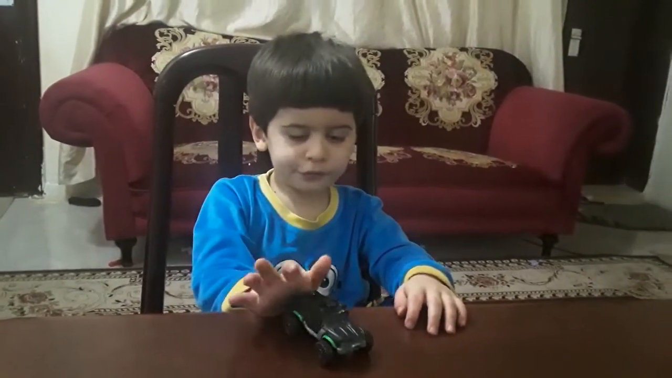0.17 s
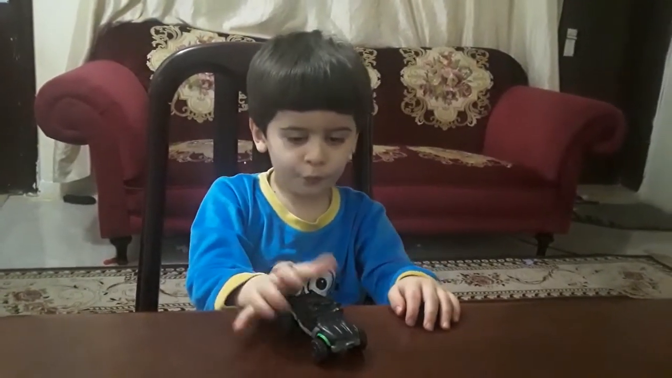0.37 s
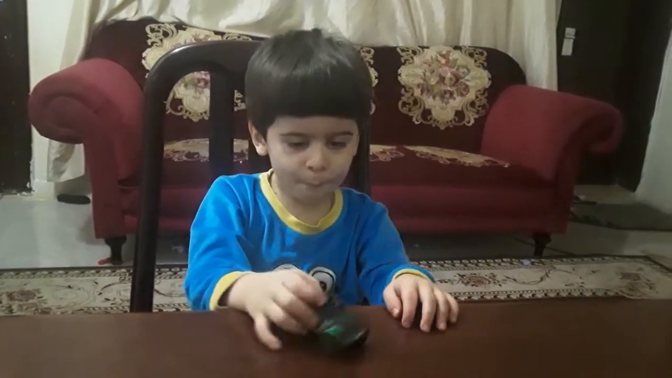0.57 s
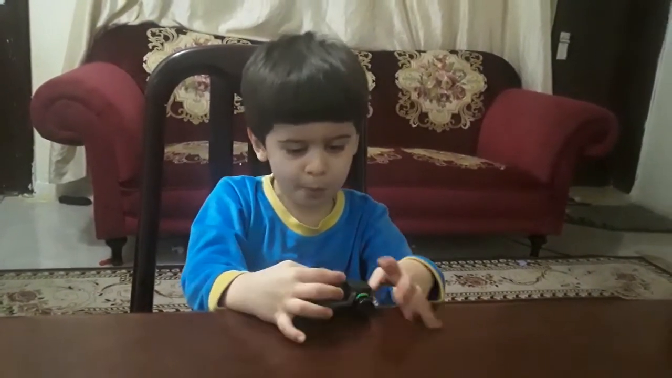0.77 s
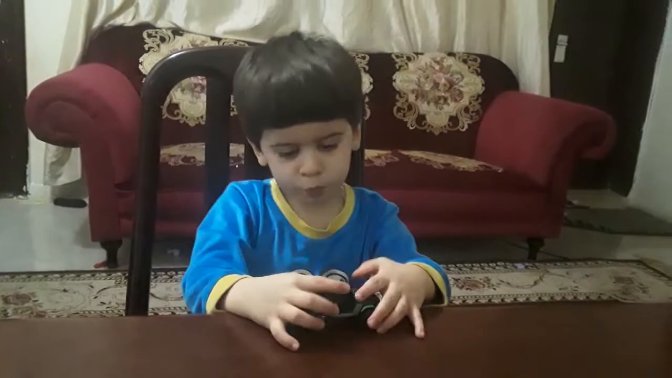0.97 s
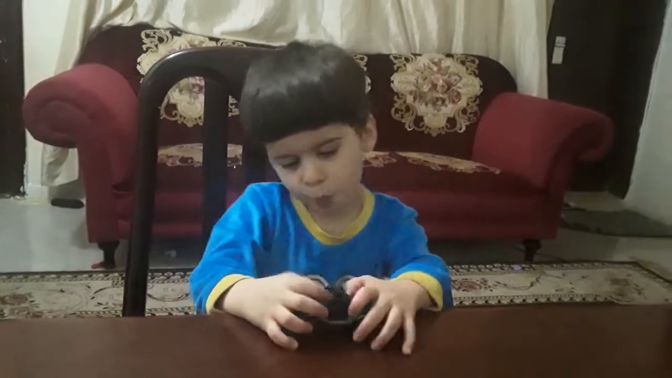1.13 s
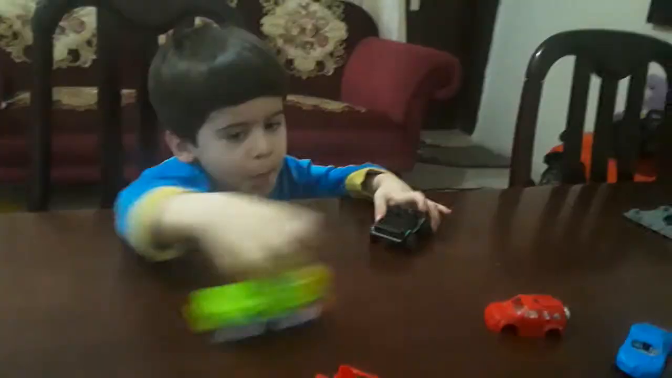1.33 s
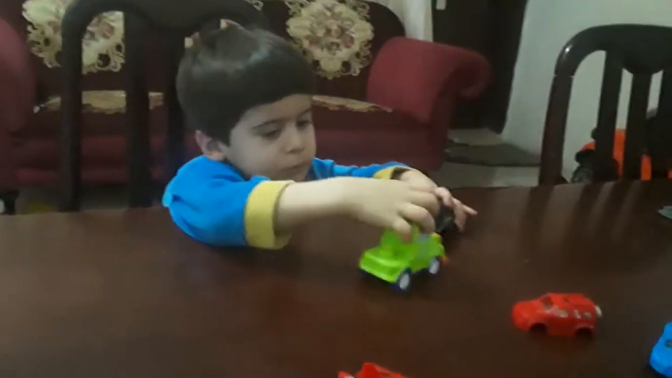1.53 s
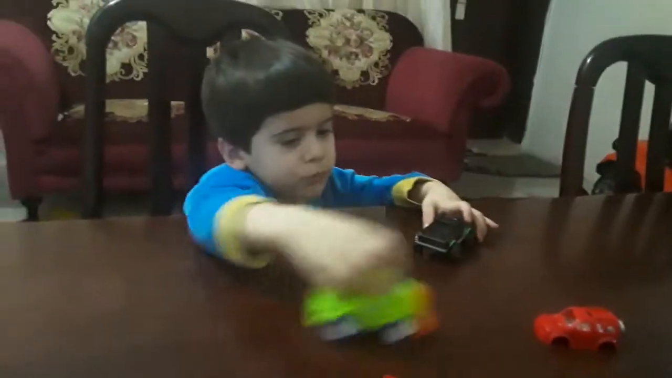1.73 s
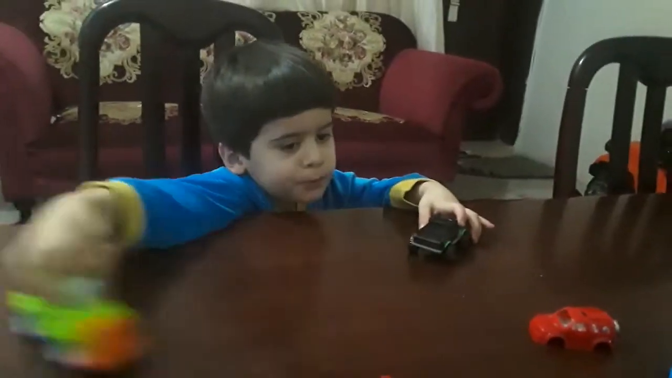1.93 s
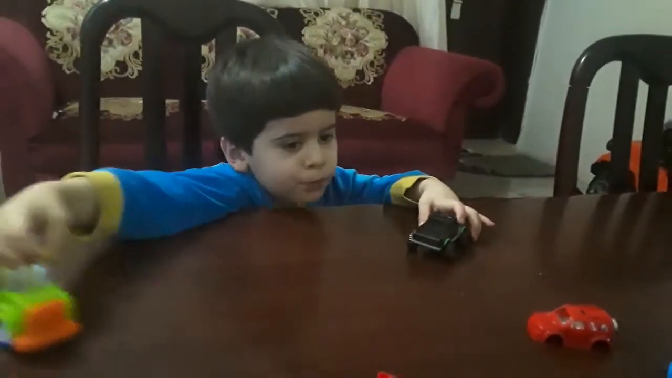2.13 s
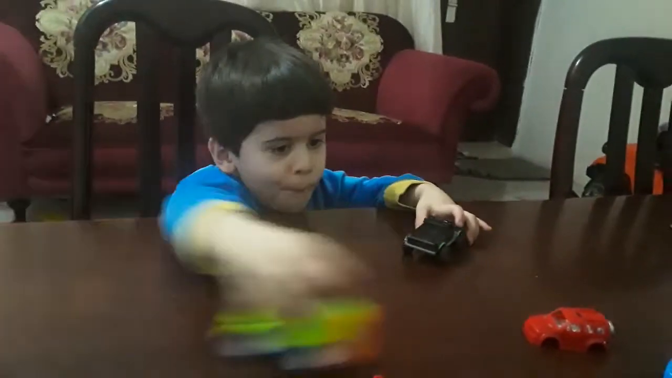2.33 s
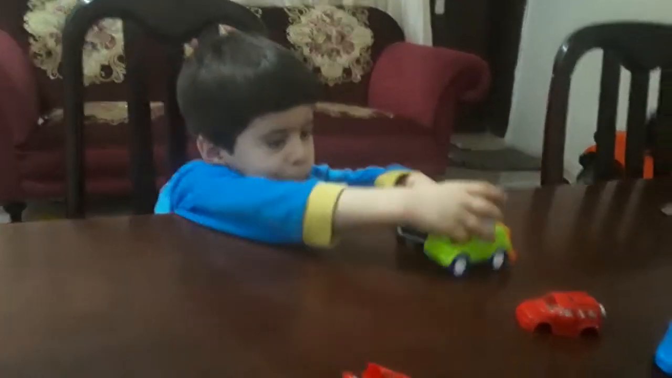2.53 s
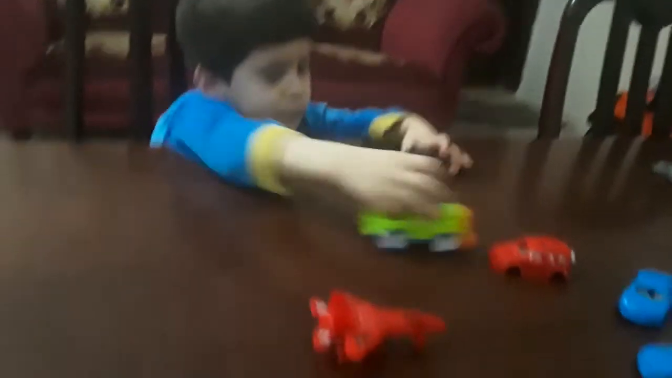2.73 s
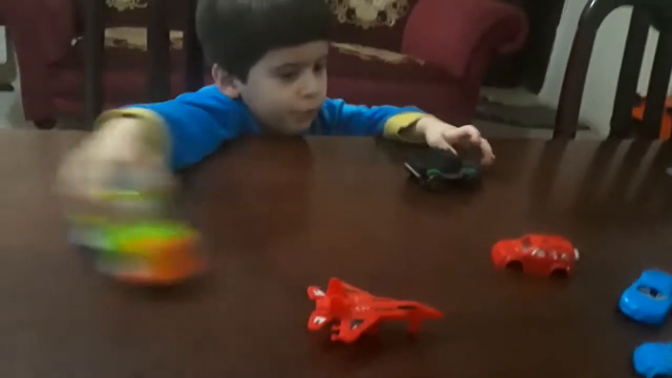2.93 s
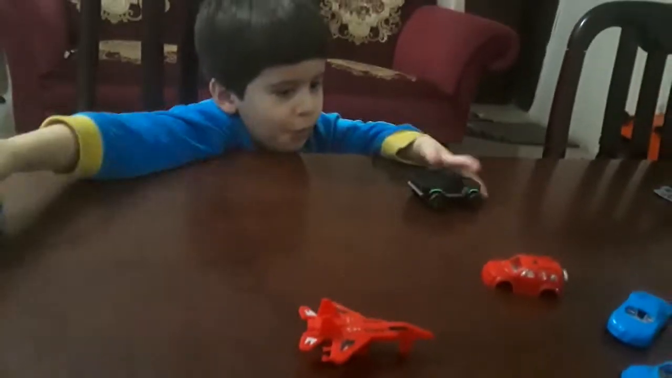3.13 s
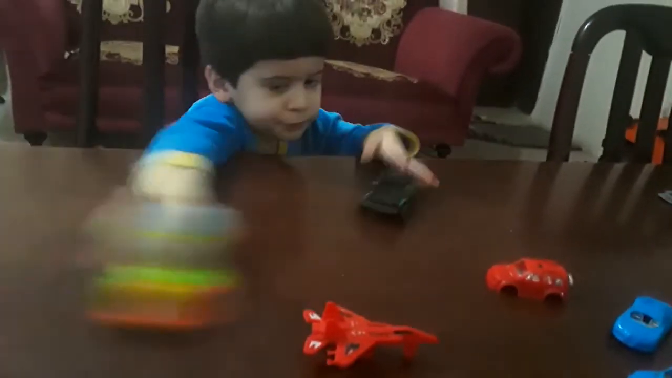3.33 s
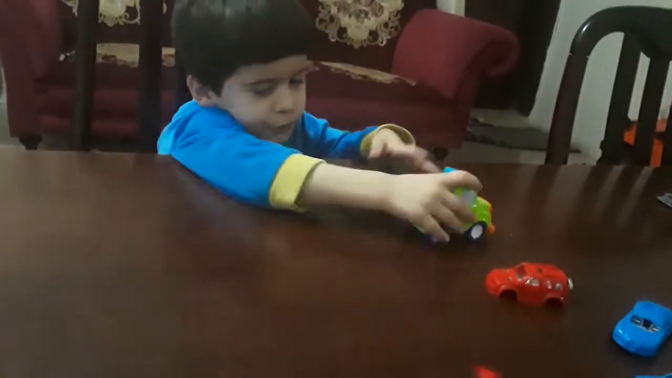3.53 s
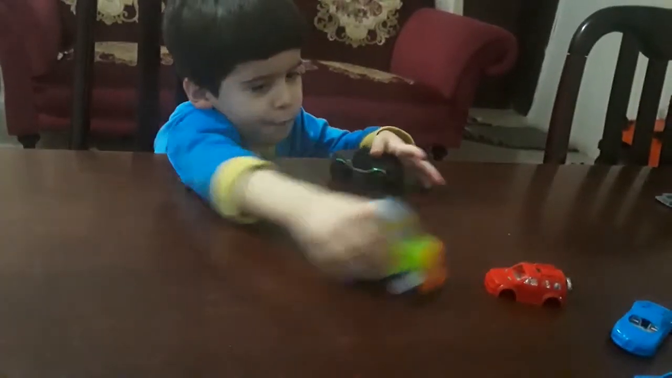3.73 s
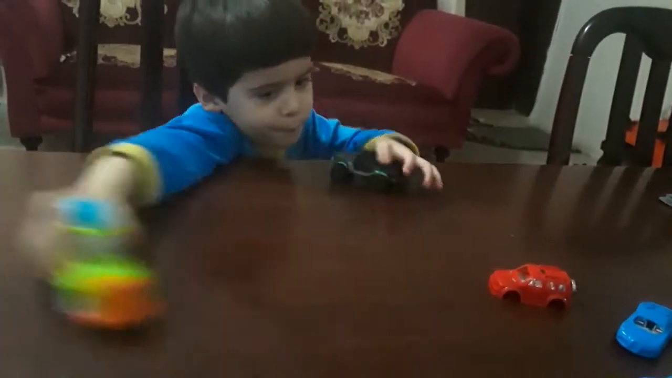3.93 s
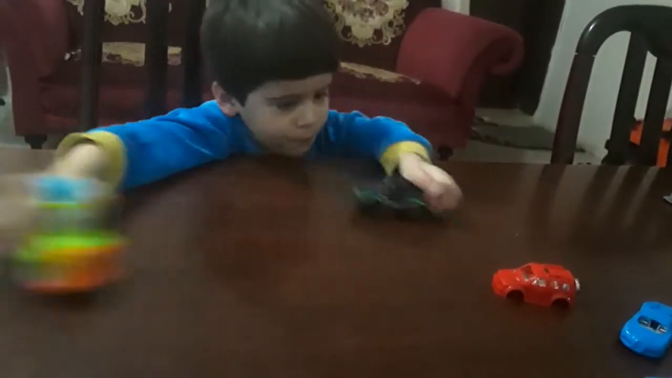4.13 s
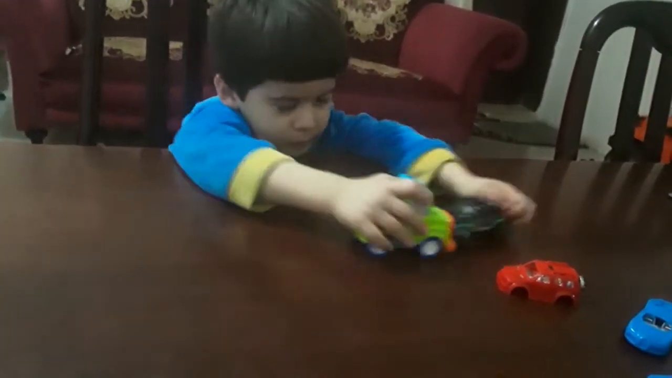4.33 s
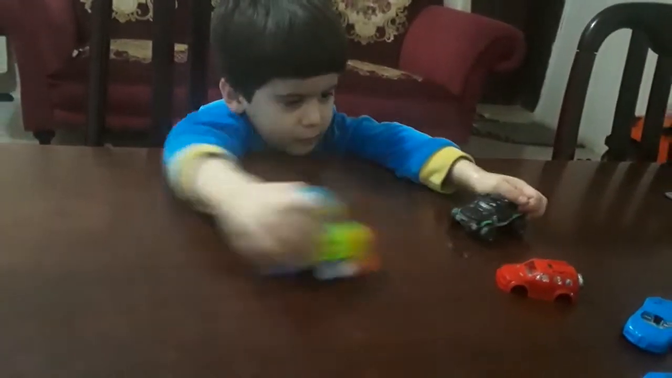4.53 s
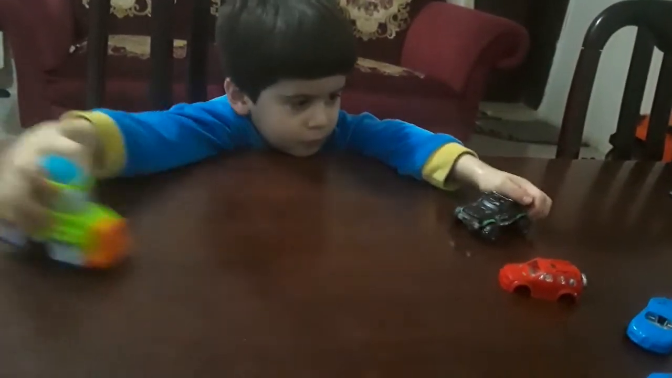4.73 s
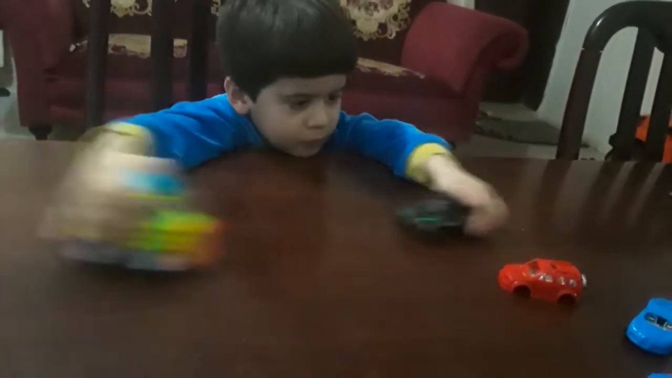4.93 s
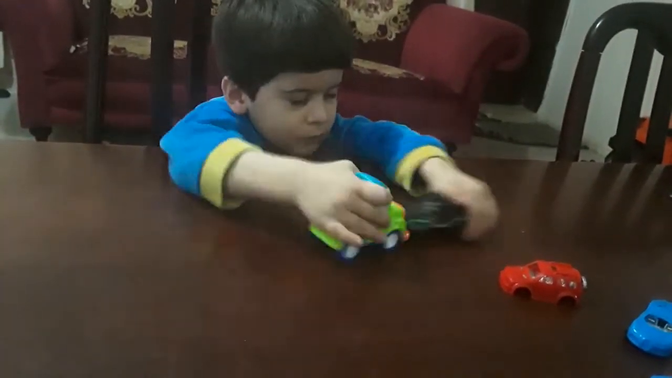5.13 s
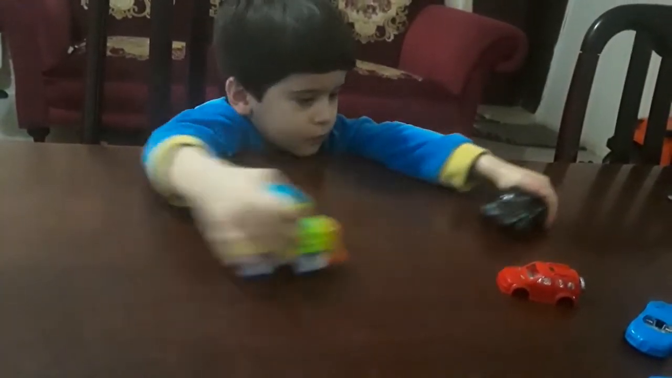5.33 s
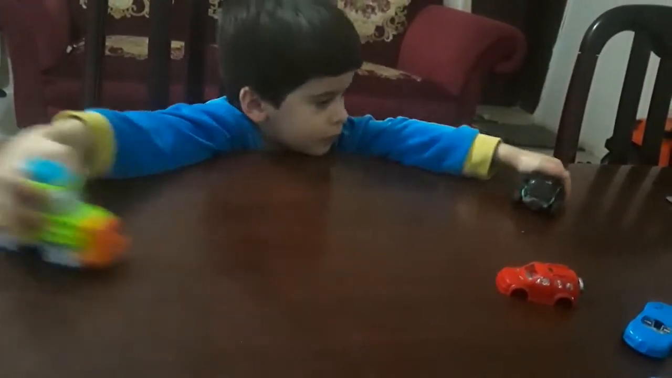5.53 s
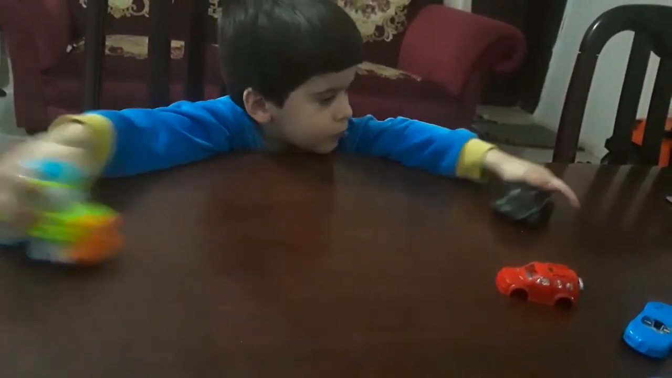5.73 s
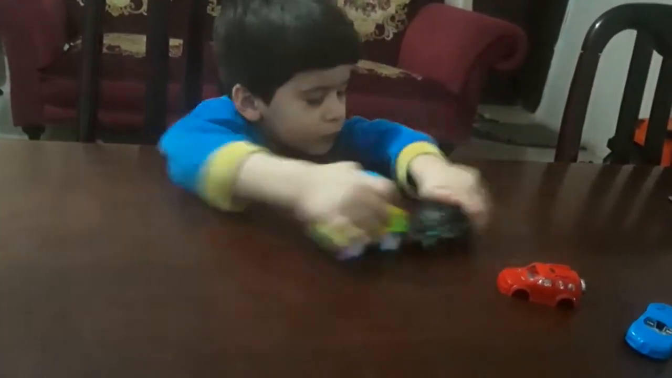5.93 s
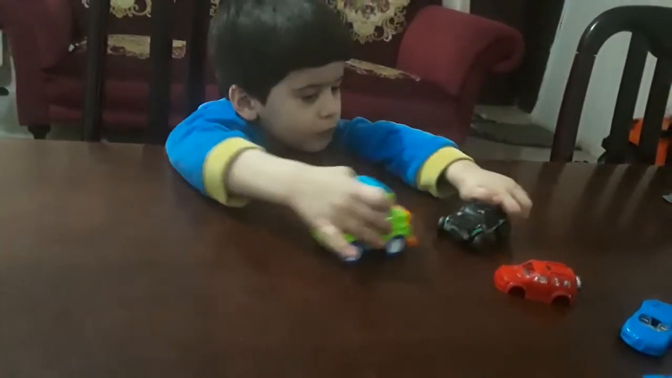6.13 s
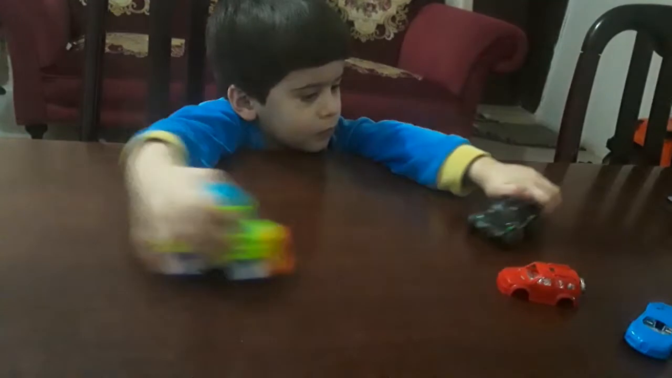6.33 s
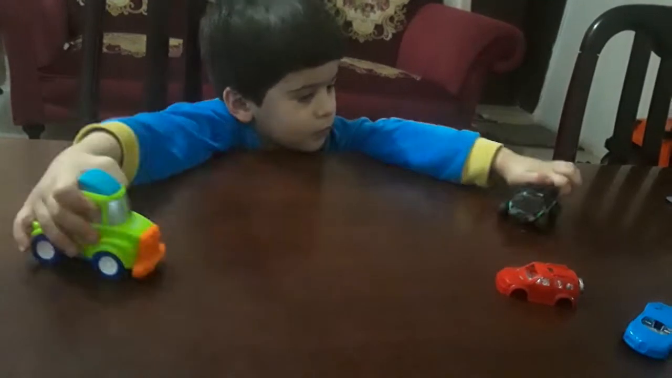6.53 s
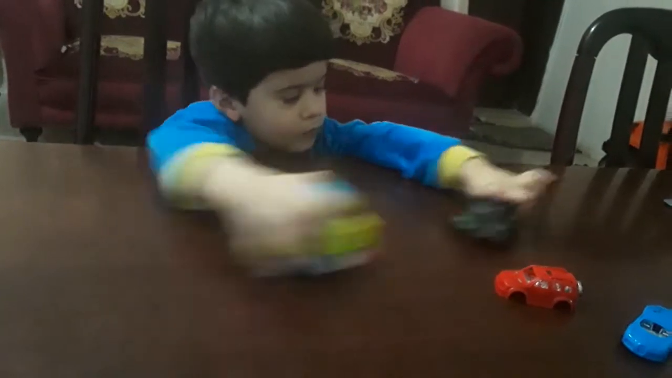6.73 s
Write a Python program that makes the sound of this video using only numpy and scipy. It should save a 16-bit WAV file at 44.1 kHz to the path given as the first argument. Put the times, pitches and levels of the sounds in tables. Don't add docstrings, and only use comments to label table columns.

```python
import sys
import numpy as np
from scipy import signal
from scipy.fft import rfft, irfft
from scipy.io import wavfile
from scipy.ndimage import uniform_filter1d

SR = 44100
rng = np.random.default_rng(int(sys.argv[2]) if len(sys.argv) > 2 else 0)


def bounce(signal):
    frames = np.transpose(np.atleast_2d(signal))
    limited = np.clip(frames, -1, 1)
    pcm = np.round(limited * 32767).astype(np.int16)
    wavfile.write(sys.argv[1], SR, pcm)


def boost(x):
    u = np.asarray(x, float) / 20
    return 10 ** u


N = 303849
SCENE_CHANGE_S = 1.376

# lowest Hz, highest Hz.
PART_RANGES = [(70, 600), (600, 1900), (1900, 3300), (3300, 9000)]
# pitch in Hz, width in Hz, level in dB over the broad sound.
SMALL_MODES = [(476, 38, 13), (2780, 120, 3), (3100, 54, 0), (6420, 130, 9), (6880, 250, 11)]
TRUCK_MODES = [(209, 150, 7.1), (340, 25, 4), (492, 71, 15.4), (826.5, 7.7, 14), (1150, 130, 4.7),
               (1380, 94, 2.3), (1696, 340, 0.38), (2380, 56, 7.7), (2770, 140, 5.3), (3550, 126, 5.4),
               (4330, 880, 8.4), (4800, 210, 8.1), (5400, 280, 4.9)]
# Hz, level in dB per Hz.
COLOUR = [(35, -51), (60, -40), (108, -5), (268, -11.5), (338, -6.5), (417, -17), (469, -15.5), (946, -7.5),
          (1310, -4.5), (2140, -1.5), (2470, 1), (6000, -5), (8920, -29.5), (13000, -16.5), (16000, -29)]
# level in dB against the rattle, growth with effort (ratio), share of the brightness (ratio).
SMALL_PARTS = [(-14, .5, -0.25), (3, 1.07, 0.21), (-2, 1.21, 0.7), (-0.5, 1.42, 1.48)]
TRUCK_PARTS = [(-13.5, 0.82, -0.26), (-1, 1.004, 0.3), (-2, 1.106, 0.18), (-5.5, 1.4, 1.63)]
# Hz, level in dB per Hz.
AIR_TONE = [(30, -33), (60, -23), (100, -10), (160, -8), (230, -18), (600, -20), (1400, -27), (1870, -19.5),
            (2300, -34.5), (6500, -37), (7800, -48), (16000, -47)]
# pitch in Hz, level in dB.
HUM = [(150.7, -65), (710.6, -68)]

# start in seconds, fastest moment in seconds, rattle in dB, brightness in dB, tyres in dB.
STROKES = [(1.2, 1.377, -18.5, -21, -57), (1.586, 1.843, -26.5, -6.5, -62.5),
           (2.139, 2.357, -25.5, -7.5, -59), (2.64, 2.88, -32.5, 1, -56), (3.207, 3.427, -24.5, 3.5, -46),
           (3.487, 3.612, -34.5, 2.5, -73), (3.8, 3.826, -42.5, 5.5, -74), (4.033, 4.286, -35, 3, -62),
           (4.443, 4.74, -39, 5, -70), (4.882, 4.997, -24.5, 0, -54), (5.32, 5.43, -34, 1.5, -64.5),
           (5.688, 5.898, -22, -1.5, -51), (6.125, 6.426, -34, 2, -64.5), (6.634, 6.802, -21, -0.5, -51)]
# start in seconds, fade in dB per second, rattle in dB, brightness in dB, tyres in dB.
NUDGES = [(0.0, 14, -68, 13.5, -99), (0.44, 60, -49, 4, -90), (0.457, 98, -43, 7, -84),
          (0.581, 35, -36, -1, -72), (0.734, 134, -32, 3.5, -72), (0.83, 102, -56, -4, -85),
          (1.065, 47, -60.5, 13.5, -88), (1.091, 108, -39.5, -5, -68), (1.15, 85, -57, 13, -84)]
SHUDDERS = [(1.366, 94.6, -15.5, -2.5, -52), (1.84, 82, -22, -8.5, -66), (2.97, 19, -37.5, 4.5, -68),
            (3.62, 20, -40, 6.5, -58.5), (4.55, 94, -38.5, 6.5, -67), (5.6, 110, -46, 5, -74),
            (2.288, 39.5, -24.5, 0, -57), (3.83, 41, -37, 2, -68), (5.2, 33, -34, 2.5, -67),
            (6.33, 62, -28, -5, -70), (3.378, 147, -21, 10.5, -37), (3.41, 130, -22.5, 7.5, -45),
            (3.501, 145, -18, 7, -39), (4.297, 100, -22, 6, -50), (4.384, 320, -19, -0.5, -59),
            (4.67, 20, -41, -23, -81), (5.085, 145, -32, 15.5, -54), (5.96, 150, -33, 15, -55),
            (6.82, 470, -23.5, 12.5, -23.5), (6.836, 69, -22, 6, -45)]
# time in seconds, level in dB.
HAND_WEIGHT = [(1.38, -3.5), (2.3, 3.5), (3.2, 2.5), (3.7, -1), (4.2, 1.5), (4.8, 1.5), (5.3, -6.5),
               (6.2, 1), (6.89, -2.5)]

# time in seconds, peak in dB, panel pitch in Hz, panel over crack in dB, thud into the table in dB.
FINGERING = [(0.0217, -38, 5830, 30, -28), (0.1153, -40.5, 5200, 6, -17), (0.4224, -40, 6300, 11, -13),
             (0.4598, -24, 3100, 15, -34), (0.4858, -30, 1790, 15, -30), (0.5183, -27, 2880, 2, -28),
             (0.592, -24, 1530, -14, -27), (0.7411, -19, 3520, 8, -34), (0.7485, -14, 2880, 2, -47),
             (0.8096, -13.5, 3080, 5, -26), (0.838, -27.5, 3720, 5, -28), (1.0995, -29, 3560, 1, -17),
             (1.1253, -29.5, 2280, 4, -9), (1.2298, -38, 2900, 5, -22)]
TICKS = [(1.3775, -10.5, 2660, 15, -13.5), (1.6575, -26, 2430, 27, -19), (1.703, -24.5, 2420, 20, -24),
         (2.1799, -44.5, 1200, 12, 9.5), (2.2488, -41, 2320, 11, -17), (2.5925, -24, 3870, 3, -5),
         (2.7267, -26, 1200, 24, -22), (2.743, -22.5, 1220, 15, -21), (2.8233, -12, 5010, 4, -17.5),
         (3.2027, -20.5, 3480, 3, -15), (3.2417, -17.5, 3600, 26, -26), (3.2809, -18, 3530, 7, -32),
         (3.6608, -17, 2780, 4, -28), (3.711, -24, 1670, -9, -32), (4.0841, -30.5, 1630, 3.5, -11),
         (4.6724, -24, 2380, 14, -31), (4.873, -34, 1130, 18, -11), (4.9216, -21, 1140, 2, -24),
         (5.4128, -22.5, 4760, 17, -36), (5.7345, -23, 1240, -10, -9.5), (6.1739, -31.5, 2380, 1, -38),
         (6.3345, -26, 4800, 16, -20), (6.657, -29.5, 2840, 8, -4.5)]
CRASHES = [(3.3705, 1, 2600, -2, -23), (3.409, 2, 1290, 0, -52), (3.4393, -3.5, 1380, 4, -32),
           (3.4929, -1, 5900, 1.5, -23.5), (3.5018, 1.5, 1460, 2.5, -26), (4.2708, -15.5, 1150, -6, -24),
           (4.2893, 2.5, 5350, -1.5, -31), (4.2985, -9, 4230, -4, -18), (4.3187, -6, 4970, 3, -40),
           (4.3864, -8, 1310, -0.5, -33), (5.0275, -12, 4650, 14, -14), (5.0783, 0.5, 2510, -1.5, -29),
           (5.1725, -16, 2330, -5, -19), (5.956, -11, 2570, 0, -30), (5.959, 0, 5200, -1, -31),
           (5.9625, -2, 2540, 4, -39), (6.8234, 0, 2780, -1.5, -51), (6.8396, -2, 4600, 13, -42),
           (6.8594, -9, 2690, 12, -37)]
JOLTS = [(1.3924, -14, 2300, 6, -44), (1.4088, -14, 2380, 6, -34), (1.4436, -12, 2290, 3, -24),
         (1.7389, -24, 2480, 5, -38), (1.8156, -23, 2870, 6, -23), (1.8458, -22, 2350, 13, -20),
         (1.8695, -19.5, 2700, 10, -27), (1.8832, -16, 2650, 9, -23), (1.9046, -24, 2850, 0, -25),
         (2.0365, -33, 2780, 12, -23), (2.2747, -20, 2260, 22, -15), (2.3176, -18, 2400, 12, -25),
         (2.337, -14, 2740, 9, -25), (2.394, -18, 2730, 0, -30), (2.4473, -19, 2750, 18, -27),
         (2.484, -19, 1780, 3, -25), (2.7855, -34, 2090, 6, -25), (2.8502, -28, 4860, 1, -25),
         (2.906, -25, 4940, 2, -22), (3.2146, -23, 3500, 5, -23), (3.3345, -13, 3500, 4, -32),
         (3.8294, -25, 2570, 6, -25), (3.9252, -31, 2460, -2, -21), (4.1147, -30, 1930, 11, -27),
         (4.1535, -30, 1565, -2, -27), (4.2543, -28, 2420, 2, -14), (4.5795, -32, 2500, 1, -22),
         (4.6892, -23, 2670, 9, -32), (4.7314, -24.5, 2750, 4, -27), (4.9944, -16.5, 2450, 4, -15),
         (5.1044, -8.5, 4440, 1, -26), (5.3918, -29, 4300, 6, -23), (5.4932, -23, 2690, 5, -23),
         (5.8225, -18, 2200, -4, -25), (5.8986, -11, 1690, 1, -21), (5.9937, -20, 2490, 9, -25),
         (6.0336, -12, 1800, 1, -24), (6.349, -21, 4800, 8, -25)]
SET_DOWN = [(2.699, -31, 1050, 10, -5)]
# time in seconds, peak in dB, lowest Hz, highest Hz.
THUMPS = [(2.6985, -18.5, 450, 1530), (1.605, -32.5, 250, 560)]
# time in seconds, level in dB.
BOOMS = [(3.37, -58), (3.494, -60), (4.29, -57), (5.078, -61), (5.959, -64), (6.823, -50)]

# pitch in Hz, level in dB against the rattle.
SIDE_PANELS = [(1310, -8), (2400, -0.5), (2790, -27), (4740, -3)]
# start in seconds, end in seconds, pitch ratio under the grip, level in dB.
PULLS = [(1.697, 2.076, 0.97, -3.5), (2.768, 3.146, 0.96, -10), (3.795, 4.03, 1, -11),
         (4.514, 4.835, 1, -2), (5.394, 5.66, 0.996, 0), (6.19, 6.467, 1.02, -12)]
# start in seconds, end in
# seconds, pitch in Hz, level in dB against the rattle.
SMALL_RINGS = [(.41, .5, 5430, -8), (0.467, .56, 2980, 5), (.58, .76, 1570, -5), (.62, .78, 2380, 1),
               (.65, .74, 3950, -6), (0.727, .8, 3400, 2), (0.853, .94, 1600, -4), (1.06, 1.18, 3630, 3)]
TRUCK_RINGS = [(1.357, 1.614, 2356, -5), (1.41, 1.54, 4580, 5), (1.615, 2.105, 4660, 5.5),
               (1.9, 2.096, 4000, 0), (2.218, 2.362, 2337, -0.5), (2.294, 2.402, 222, 0),
               (2.32, 2.55, 1292, -6), (2.334, 2.616, 2820, -8.5), (3.198, 3.223, 3540, 11),
               (3.236, 3.255, 3580, 8), (3.297, 3.39, 3590, 1.5), (3.255, 3.613, 1317, -3.5),
               (3.515, 3.602, 1644, 2.5), (4.09, 4.325, 1360, -4), (4.133, 4.198, 1520, 2),
               (4.348, 4.404, 340, 4.5), (4.657, 4.856, 2736, 5.5), (5.017, 5.068, 468, 6.5),
               (5.408, 5.665, 2770, 2), (1.355, 1.463, 1150, -12), (1.77, 2.12, 2690, -11),
               (2.883, 3.15, 2800, -15), (3.79, 4.01, 2610, -3.5), (4.512, 4.816, 2514, 0),
               (5.795, 5.89, 344, 4.5), (5.947, 6.015, 1234, -3), (5.974, 6.06, 2500, -14),
               (2.73, 2.95, 4950, -3), (2.92, 3.05, 4350, -0.5), (3.6, 3.08, 2900, -1.5),
              (3.5, 3.0, 2350, 3), (2.84, 2.93, 1340, -6), (3.0, 3.07, 1280, -6), (3.85, 4.03, 4350, -2),
              (3.81, 3.89, 5580, -1), (4.2, 4.29, 5200, -4), (4.23, 4.3, 1150, -4), (4.86, 4.96, 1120, -3),
              (4.67, 4.78, 2440, -0.5), (4.95, 5.07, 4800, -2.5), (5.89, 5.93, 1700, -5),
              (5.97, 6.01, 4600, -5), (6.2, 6.33, 1320, -3), (1.84, 1.96, 2810, -2), (2.3, 2.43, 4500, -1),
              (3.5, 3.56, 5700, -5.5), (3.36, 3.45, 6200, -8), (3.28, 3.45, 1100, -6.5),
              (5.74, 5.86, 5700, -8), (1.59, 1.62, 293, 2), (2.78, 2.86, 214, -2), (1.1, 1.1, 2300, -2)]
# start in seconds, end in seconds, pitch in Hz, width in Hz, share removed from 0 to 1.
DAMPED = [(1.72, 1.843, 3540, 900, .4), (2.932, 3.195, 3550, 800, 0.6), (3.85, 4.03, 3450, 900, 0.6),
          (4.56, 4.851, 3550, 700, 0.45), (5.496, 5.72, 3600, 800, 0.1)]


def unit(x):
    return x / np.sqrt(np.mean(x ** 2))


def response(gain_db, size=2048):
    hz = np.maximum(np.fft.rfftfreq(2 * size, 1 / SR), 1.)
    cepstrum = irfft(gain_db(hz) * np.log(10) / 20)
    cepstrum[1:size] *= 2
    cepstrum[size + 1:] = 0
    return irfft(np.exp(rfft(cepstrum)))[:size]


def equal_power(h):
    return h / np.sqrt(np.sum(h ** 2))


def through(x, h):
    return signal.oaconvolve(x, h)[:len(x)]


def resonate(x, hz, sharpness):
    b, a = signal.iirpeak(hz, sharpness, fs=SR)
    return signal.lfilter(b, a, x)


def band(x, order, edges_hz):
    return signal.sosfilt(signal.butter(order, edges_hz, "band", fs=SR, output="sos"), x)


def spectrum_db(hz, points):
    points_hz, points_db = np.array(points).T
    return np.interp(np.log(hz), np.log(points_hz), points_db)


def modes_db(hz, modes):
    humps = sum(boost(2 * db) / (1 + (2 * (hz - f) / width) ** 2) for f, width, db in modes)
    return 10 * np.log10(1 + humps)


def walk(rate, size=N):
    k = int(SR / rate)
    steps = np.repeat(rng.standard_normal(size // k + 1), k)
    return 1.04 * uniform_filter1d(steps, k)[:size]


def rattle(rate, spread_db, rub_db, size=N):
    noise = rng.standard_normal(size)
    hits = rng.random(size) < rate / SR
    force = boost(spread_db * np.minimum(rng.exponential(size=size), 3))
    taps = hits * np.sign(noise) * force
    return unit(unit(taps) + boost(rub_db) * noise)


def free_panels():
    sides = [(start, end, hz * ratio, db + pull_db)
             for start, end, ratio, pull_db in PULLS for hz, db in SIDE_PANELS]
    return SMALL_RINGS + TRUCK_RINGS + sides


def car(t, parts_db, modes, patchy_db):
    ring_sharpness = 11.5
    bumps = 0.6 * walk(30, size=len(t)) + 1.7 * walk(130, size=len(t))
    out = 0
    for (lo, hi), db in zip(PART_RANGES, parts_db):
        def part_db(hz):
            skirts = -10 * np.log10(1 + (lo / hz) ** 10) - 10 * np.log10(1 + (hz / hi) ** 10)
            return skirts + spectrum_db(hz, COLOUR) + modes_db(hz, modes)

        level_db = db + bumps + patchy_db * walk(45, size=len(t))
        shake = rattle(800, spread_db=1.5, rub_db=1.0, size=len(t)) * boost(level_db)
        out = out + through(shake, equal_power(response(part_db)))
        for k, (start, end, hz, ring_db) in enumerate(free_panels()):
            free = (t > start) & (t < end + .03)
            if lo <= hz < hi and free.any():
                freedom = np.clip(np.minimum(t[free] - start, end - t[free]) / 0.014, 0, 1)
                freedom = freedom * boost(1.6 * np.roll(bumps, 9973 * k)[free])
                ring = resonate(resonate(freedom * shake[free], hz, ring_sharpness), hz, ring_sharpness)
                out[free] += boost(ring_db) * np.sqrt(2 * SR * ring_sharpness / np.pi / hz) * ring
    return out


def palm(t, x):
    out = x
    for start, end, hz, width_hz, share in DAMPED:
        grip = np.clip(np.minimum(t - start, end - t) / .03, 0, 1)
        out = out - share * grip * resonate(x, hz, hz / width_hz)
    return out


def stroke_db(t):
    last_stop_s = 7
    rise_db, fall_db = 27, 30.5
    creep = 0.086
    start, fastest = np.array(STROKES).T[:2, :, None]
    stop = np.append(start[1:], last_stop_s)[:, None]
    rise = np.sin(np.pi / 2 * np.clip((t - start) / (fastest - start), 0, 1))
    fall = np.sin(np.pi / 2 * np.clip((stop - t) / (stop - fastest), 0, 1))
    db = np.where(t < fastest, rise_db * np.log10(rise + creep), fall_db * np.log10(fall + creep))
    return db - 3000 * (np.maximum(start - t, 0) + np.maximum(t - stop, 0))


def shake_db(t, rows):
    attack_s = .007
    start, fade_db = np.array(rows).T[:2, :, None]
    attack = np.clip((t - start) / attack_s, 1e-6, 1)
    return 20 * np.log10(attack) - fade_db * np.maximum(t - start, 0)


def effort(t, shapes_db, rows, parts, tyre_growth):
    usual_db = -30
    rattle_db, bright_db, tyres_db = np.array(rows).T[2:, :, None]
    above_usual = rattle_db + shapes_db - usual_db
    each = [usual_db + db + growth * above_usual + share * bright_db for db, growth, share in parts]
    each.append(tyres_db + tyre_growth * shapes_db)
    return [10 * np.log10(boost(2 * db).sum(axis=0)) for db in each]


def movements(t, before):
    stroke_tyres, shake_tyres = 1.5, 1.1
    slow = t[::64]
    fingers = effort(slow, shake_db(slow, NUDGES), NUDGES, SMALL_PARTS, shake_tyres)
    shapes_db = np.vstack([stroke_db(slow), shake_db(slow, SHUDDERS)])
    tyre_growth = np.repeat([stroke_tyres, shake_tyres], [len(STROKES), len(SHUDDERS)])[:, None]
    arm = effort(slow, shapes_db, STROKES + SHUDDERS, TRUCK_PARTS, tyre_growth)
    arm[0] = arm[0] + np.interp(slow, *np.transpose(HAND_WEIGHT))
    return [np.where(before, np.interp(t, slow, a), np.interp(t, slow, b)) for a, b in zip(fingers, arm)]


def knocks():
    # rise in seconds, ring time to -60 dB in seconds, sharpness of a 3 kHz panel
    kinds = [(FINGERING, (0.00087, 0.025, 9)), (TICKS, (0.00054, 0.029, 18.5)),
             (CRASHES, (0.00063, 0.027, 7.5)), (JOLTS, (.001, .03, 8.1)), (SET_DOWN, (.002, .022, 5))]
    blows = [(*row, *kind) for rows, kind in kinds for row in rows]
    t = np.arange(int(.08 * SR)) / SR
    chance = rng.standard_normal((len(blows), 3, len(t)))
    plastic = response(lambda hz: spectrum_db(hz, COLOUR) + 1.96 * np.log2(hz / 3000), size=512)
    soft = signal.butter(4, 7500, fs=SR, output="sos")
    out = np.zeros(N + len(t))
    for (s, db, hz, panel_db, thud_db, rise, t60, sharp), (a, b, c) in zip(blows, chance):
        fade = np.exp(-np.log(1000) * t / t60) * np.minimum(t / rise, 1)
        panel = through(resonate(b * fade, hz, sharp * hz / 3000), plastic)
        crack = through(a * fade, plastic)
        dull = signal.sosfiltfilt(soft, crack)
        crack = dull + boost(0.61 * db - 0.5) * (crack - dull)
        blow = unit(crack) + boost(panel_db) * unit(panel)
        thud = band(c * np.exp(-t / 0.0076), 2, [150, 900])
        both = blow / np.abs(blow).max() + boost(thud_db) * thud / np.abs(thud).max()
        i = int(s * SR)
        out[i:i + len(t)] += boost(db) * both
    return out[:N]


def thumps():
    rise_s, fade_s = .003, 0.0038
    t = np.arange(int(0.043 * SR)) / SR
    out = np.zeros(N)
    for s, db, lo_hz, hi_hz in THUMPS:
        push = rng.standard_normal(len(t)) * np.minimum(t / rise_s, 1) * np.exp(-t / fade_s)
        bump = band(push, 3, [lo_hz, hi_hz])
        i = int(s * SR)
        out[i:i + len(t)] += boost(db) * bump / np.abs(bump).max()
    return out


def tyres(speed_db):
    def hiss_db(hz):
        skirts = -10 * np.log10(1 + (10000 / hz) ** 16) - 10 * np.log10(1 + (hz / 14000) ** 12)
        return spectrum_db(hz, COLOUR) + skirts

    t = np.arange(N) / SR
    level_db = speed_db + 1.8 * walk(40) - 1.0
    grain = rattle(2500, spread_db=4.0, rub_db=-14.5) * boost(level_db)
    hiss = through(grain, equal_power(response(hiss_db)))
    squeak = unit(resonate(rng.standard_normal(N), 12000, 35.0))
    return hiss + boost(-67) * np.exp(-((t - .655) / 0.054) ** 4) * squeak


def booms():
    t60_s = 0.56
    t = np.arange(N) / SR
    low = unit(band(rng.standard_normal(N), 2, (42, 80)))
    return low * sum((t > s) * boost(db - 60 * np.maximum(t - s, 0) / t60_s) for s, db in BOOMS)


def room(x):
    t60_s, echo_db = 0.4, -7.5
    t = np.arange(int(.6 * SR)) / SR
    place = np.arange(N) / SR / .05
    lowpass = signal.butter(1, 3000, fs=SR, output="sos")
    wet = 0
    for k, noise in enumerate(rng.standard_normal((4, len(t)))):
        dull = signal.sosfilt(lowpass, noise)
        tail = dull * boost(-60 * t / t60_s) + (noise - dull) * boost(-60 * t / (0.54 * t60_s))
        tail *= np.clip((t - .003) / 0.0027, 0, 1)
        here = np.cos(np.pi / 2 * np.clip((place - k + 2) % 4 - 2, -1, 1))
        wet = wet + through(x * here, equal_power(tail))
    return x + boost(echo_db) * wet


def hush(before):
    t = np.arange(N) / SR
    air = unit(through(rng.standard_normal(N), response(lambda hz: spectrum_db(hz, AIR_TONE))))
    hum = sum(boost(db + 2.0 * walk(13.6)) * np.sqrt(2) * np.sin(2 * np.pi * hz * t) for hz, db in HUM)
    return boost(-62) * air + before * hum


def scene():
    t = np.arange(N) / SR
    before = t < SCENE_CHANGE_S
    *parts_db, tyres_db = movements(t, before)
    small = car(t[before], [db[before] for db in parts_db], SMALL_MODES, patchy_db=2.2)
    truck = car(t[~before], [db[~before] for db in parts_db], TRUCK_MODES, patchy_db=-0.3)
    cars = boost(-5.5) * palm(t, np.concatenate([small, truck]))
    heard = room(cars + tyres(tyres_db) + knocks()) + hush(before) + booms() + thumps()
    return np.array([heard, heard])


def roll_off(x):
    return signal.sosfilt(signal.butter(12, 16990, fs=SR, output="sos"), x)


def record(dry):
    smear = rng.standard_normal(400) / 20
    treble = signal.sosfilt(signal.butter(4, 6500, "high", fs=SR, output="sos"), dry[0])
    side = boost(-15) * through(treble, smear) * np.array([[1], [-1]])
    rounded = np.tanh(0.57 * (dry + side)) / 0.66
    top = signal.ellip(10, .3, 60, 15900, fs=SR, output="sos")
    return roll_off(signal.sosfilt(top, rounded))


dry = scene()
out = record(dry)
bounce(out)
```